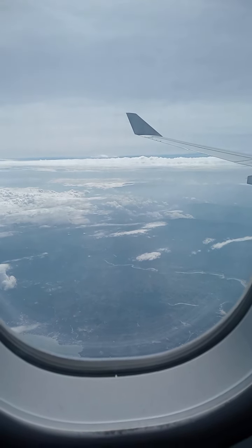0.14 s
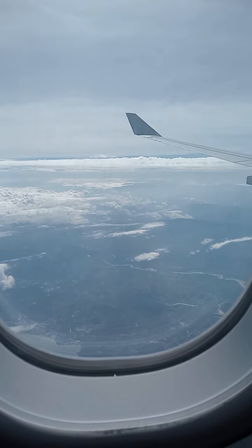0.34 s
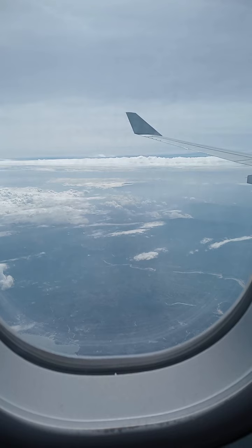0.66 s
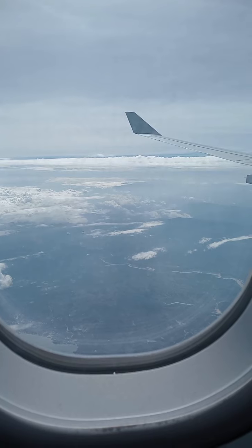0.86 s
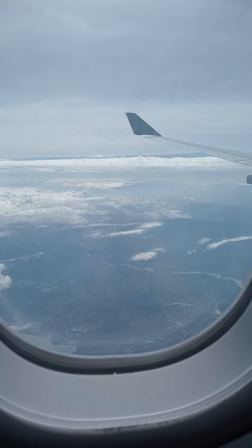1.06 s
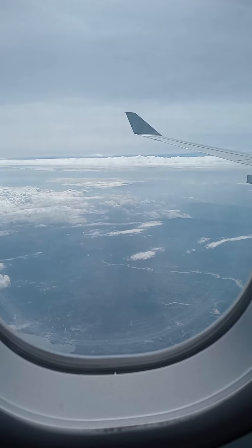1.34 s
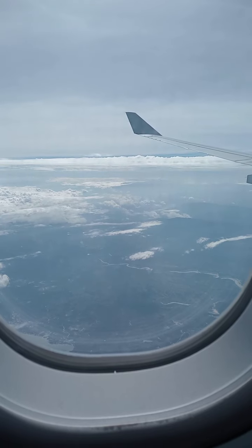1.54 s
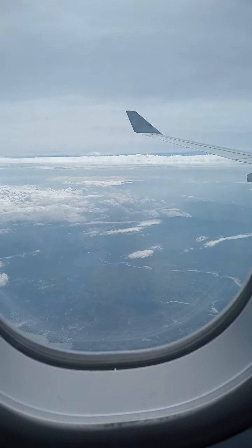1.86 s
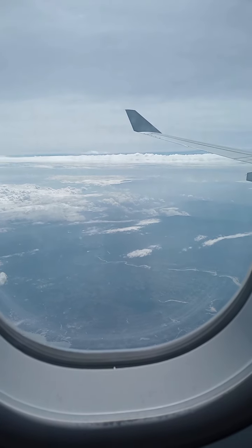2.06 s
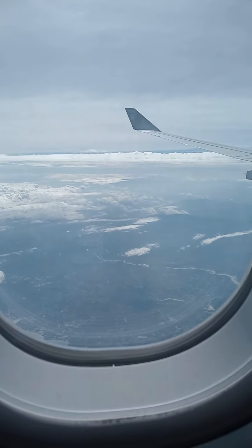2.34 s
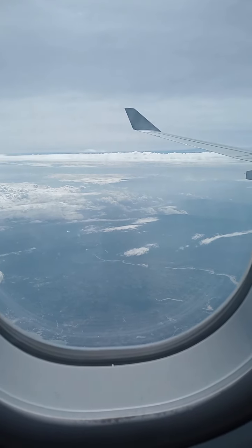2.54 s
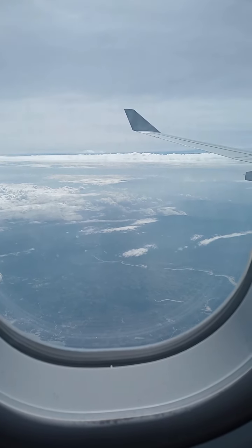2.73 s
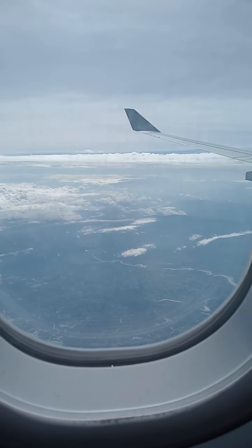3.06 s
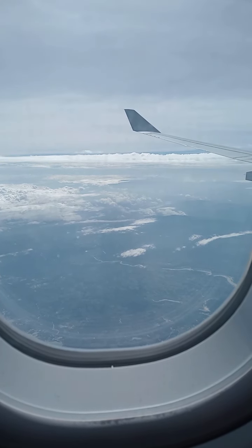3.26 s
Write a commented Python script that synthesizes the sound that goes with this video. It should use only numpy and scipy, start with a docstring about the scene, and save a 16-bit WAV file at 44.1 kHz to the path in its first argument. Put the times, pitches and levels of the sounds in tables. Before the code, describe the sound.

Low, wavering airliner cabin drone with rushing air, soft vent hiss and faint late clacks

```python
"""Engine and airflow rumble booming inside an airliner cabin in cruise, at a microphone in the cabin.
Around it are the roar of air along the skin with a drifting resonance, and the hiss and whistles of the vents:
all noise, filtered and made to waver. A faint electrical whine is a stack of steady sines. The top treble holds
thin air and a fluttering fizz of short noise flurries; three small clacks some rows away are decaying noise bursts."""
import sys
import numpy as np
from scipy import signal
from scipy.fft import rfft, irfft
from scipy.io import wavfile
from scipy.ndimage import uniform_filter1d

SR = 44100
rng = np.random.default_rng(int(sys.argv[2]) if len(sys.argv) > 2 else 0)


def persist_wave(psi):
    """Save psi, clipped to +-1, as 16-bit WAV."""
    counts = np.round(np.clip(psi, -1, 1) * 32767).astype(np.int16)
    wavfile.write(sys.argv[1], SR, np.atleast_2d(counts).T)


N = 149940  # 3.4 s


def amp(db):
    """Turns dB into an amplitude factor."""
    return 10 ** (np.asarray(db) / 20)


def evened(x):
    """Scales x to an rms of 1."""
    return x / np.sqrt(np.mean(x ** 2) + 1e-20)


def read(points, hz):
    """Reads a spectrum of (Hz, dB) points, joined by straight lines over log frequency."""
    f, value = np.transpose(points)
    return np.interp(np.log(hz + 1), np.log(f + 1), value)


def level_line(points):
    """Joins (seconds, value) points into one value per sample."""
    return np.interp(np.arange(N) / SR, *np.transpose(points))


def coloured(x, db_at):
    """Filters x by a level in dB per frequency."""
    gain = amp(db_at(np.fft.rfftfreq(len(x), 1 / SR)))
    return irfft(rfft(x) * gain, len(x))


def wander(low_hz, high_hz):
    """Irregular drift of rms 1: sixteen sines of random phase, weaker as they get faster."""
    t = np.arange(N) / SR
    rates = np.geomspace(low_hz, high_hz, num=16)
    return evened(sum(np.sin(2 * np.pi * (f * t + rng.random())) / np.sqrt(f) for f in rates))


def airflow(spectrum, patchy_db, swell_db):
    """Turbulent air: coloured noise with drifting patches in time and pitch and one shared swell, at rms 1."""
    real, imag, patches = rng.standard_normal((N // 256 + 5, 513, 3)).T
    patches = uniform_filter1d(patches, size=12, axis=0)  # across pitch
    patches = evened(uniform_filter1d(patches, size=5, axis=1))  # across time
    grid = (real + 1j * imag) * amp(patchy_db * patches)
    noise = signal.istft(grid, nperseg=1024, noverlap=768)[1][:N]
    swelling = noise * amp(swell_db * wander(4, 24))
    return evened(coloured(swelling, lambda hz: read(spectrum, hz)))


# Rumble in the cabin, with its booms. Each row: frequency in Hz, relative density in dB per Hz.
RUMBLE_SPECTRUM = [(12, -59.5), (20, -36.5), (27, -34.5), (38, -25.5), (81, -9.5), (110, -1.5), (125, 3),
                   (189, -6.5), (228, -4.5), (271, -11.5), (322, -7.5), (358, -10), (393, -9.5),
                   (443, -22.5), (480, -28.5), (620, -51.5), (1060, -120)]
# Level of the rumble over time, an irregular random wavering of low noise.
# Each row: time in seconds, level of the boom in dB, level of the rest of the rumble in dB.
RUMBLE_LEVELS = [(0.02, -25.5, -26), (0.35, -17.5, -23.5), (0.51, -22, -28), (0.54, -31, -18.5),
                 (0.57, -15.5, -27.5), (0.75, -25, -23.5), (0.95, -15, -25.5), (1.14, -26.5, -24),
                 (1.2, -16, -25.5), (1.44, -30, -25), (1.47, -15, -22.5), (1.58, -31, -26),
                 (1.61, -16, -23), (1.7, -27, -27), (2.07, -20, -24), (2.1, -26.5, -24.5),
                 (2.29, -19.5, -26), (2.34, -23.5, -23.5), (2.5, -18, -25.5), (2.54, -25.5, -24.5),
                 (2.62, -14.5, -24), (2.85, -22, -24), (3.23, -20.5, -23.5), (3.38, -26, -24)]
BOOM_HZ, BOOM_OCTAVES = 130, 0.36  # centre; distance to the -6 dB point on either side


def rumble():
    """Engine and airflow noise in the cabin; its low boom and remaining rumble waver in level separately, as
    low noise does by chance."""
    noise = airflow(RUMBLE_SPECTRUM, patchy_db=-0.12, swell_db=0.96)

    def boom_band(hz):
        octaves = np.log2((hz + 1) / BOOM_HZ)
        return np.maximum(-6 * (octaves / BOOM_OCTAVES) ** 4, -100)

    boom = coloured(noise, boom_band)
    rest = noise - boom
    # the level of the rest is counted against the noise between 190 and 430 Hz
    rest_rms = np.std(coloured(noise, lambda hz: -100. * ((hz < 190) | (hz > 430))))
    s, boom_db, rest_db = np.transpose(RUMBLE_LEVELS)
    t = np.arange(N) / SR
    boom_gain = amp(np.interp(t, s, boom_db))
    rest_gain = amp(np.interp(t, s, rest_db))
    return evened(boom) * boom_gain + rest / rest_rms * rest_gain


# Air along the skin, heard from inside. Each row: frequency in Hz, relative density in dB per Hz.
ROAR_SPECTRUM = [(270, -33.5), (460, -13.5), (555, -7.5), (625, -10.5), (676, -3.5), (766, -5), (848, -2.5),
                 (939, -5.5), (1240, -12.5), (1490, -14.5), (2120, -24), (2280, -25), (3000, -35),
                 (3900, -72.5), (6600, -120)]
ROAR_DB = -31  # rms


def roar():
    """Air rushing along the skin: mid-range turbulent noise with a slight swell."""
    return amp(ROAR_DB) * airflow(ROAR_SPECTRUM, patchy_db=1.57, swell_db=0.48)


# A resonance drifting in the roar. Each row: time in seconds, frequency in Hz.
HOWL_PITCH = [(0, 859), (0.501, 829), (.9, 876.4), (1.3, 848.6), (1.899, 885.4), (2.299, 822), (2.7, 850.6),
              (3.0, 825.4), (3.4, 864)]
HOWL_DB, HOWL_WIDTH_HZ = -41, 86  # rms; width between the -6 dB points


def howl():
    """A narrow band of noise shifted onto the drifting resonance by two carriers a quarter turn apart."""
    def band(hz):
        return -20 * np.log10(1 + (2 * hz / HOWL_WIDTH_HZ) ** 2)

    a, b = (coloured(noise, band) for noise in rng.standard_normal((2, N)))
    phase = 2 * np.pi * np.cumsum(level_line(HOWL_PITCH)) / SR
    return amp(HOWL_DB) * evened(a * np.cos(phase) + b * np.sin(phase))


# Hiss of the cabin vents. Each row: frequency in Hz, relative density in dB per Hz.
HISS_SPECTRUM = [(1700, -26), (2900, -10), (3100, -5), (3700, -4.5), (3850, -1.5), (4100, 0), (4330, -0.5),
                 (4550, -1.5), (4750, -2), (5900, -2), (6060, -1.5), (6300, -4), (6910, -11), (7390, -13.5),
                 (7600, -14.5), (9600, -26), (16300, -120)]
# Fuzzy whistles in the vents. Each row: frequency in Hz, rms level in dB.
VENT_WHISTLES = [(2255, -59.5), (3957, -73.5), (9630, -87.5)]
HISS_DB, WHISTLE_WIDTH_HZ = -51.5, 29  # rms of the hiss; width between the -6 dB points


def vents():
    """Turbulent hiss of the vents, with a few narrow noise bands as fuzzy whistles."""
    out = amp(HISS_DB) * airflow(HISS_SPECTRUM, patchy_db=1.5, swell_db=.3)
    for whistle_hz, db in VENT_WHISTLES:
        def band(hz):
            return -20 * np.log10(1 + (2 * (hz - whistle_hz) / WHISTLE_WIDTH_HZ) ** 2)

        out += amp(db) * evened(coloured(rng.standard_normal(N), band))
    return out


WHINE_HZ = 800  # fundamental, itself silent
# Partials of the whine heard in the cabin. Each entry: multiple of the fundamental.
WHINE_MULTIPLES = [7, 8, 9, 10, 12, 13, 14, 15, 16, 17, 18, 19]
# Strength of those partials, in the same order. Each entry: rms level in dB.
WHINE_LEVELS = [-78.5, -74.5, -74.5, -84, -80, -88, -86, -89, -88, -92.5, -89.5, -99]


def whine():
    """Steady high partials of the cabin's electrical supply, as sines of random phase."""
    t = np.arange(N) / SR
    out = np.zeros(N)
    for k, db in zip(WHINE_MULTIPLES, WHINE_LEVELS):
        out += amp(db) * np.sqrt(2) * np.sin(2 * np.pi * (k * WHINE_HZ * t + rng.random()))
    return out


# Colour of the treble fizz. Each row: frequency in Hz, relative density in dB per Hz.
FIZZ_SPECTRUM = [(7000, -17.5), (8500, -0.5), (9800, -3), (10250, 4), (10600, -7.5), (11900, -8.5),
                 (12300, -2), (13000, -1.5), (13400, -7.5), (14200, -6.5), (14550, 0), (14900, -10.5),
                 (15500, -6.5)]
# Flurries of fizz. Each row: start in seconds, length in seconds, level in dB.
FIZZ_FLURRIES = [(0.137, .06, -65), (.26, 0.071, -65), (.53, 0.074, -70), (.68, .04, -71),
                 (0.807, 0.058, -65), (.93, .06, -67), (1.229, .04, -63), (1.28, .04, -70),
                 (1.408, .05, -68), (1.544, .11, -63.5), (1.831, 0.028, -69), (1.916, 0.077, -68),
                 (2.028, .02, -67), (2.255, 0.033, -63), (2.31, 0.097, -66), (2.49, 0.016, -66),
                 (2.586, 0.11, -64), (3.076, .04, -74), (3.127, 0.043, -65), (3.2, .03, -76),
                 (3.32, 0.04, -66)]
FIZZ_EDGE_S = .004  # fade at either end of a flurry
FIZZ_GRAIN_DB, FIZZ_FLUTTER_DB = 2, 2.5  # rms of the level changes


def fizz():
    """Short grainy flurries of noise in the top treble, fluttering at 25 to 80 Hz."""
    t = np.arange(N) / SR
    gate = np.zeros(N)
    for start, length, db in FIZZ_FLURRIES:
        to_nearest_end = np.minimum(t - start, start + length - t)
        gate += amp(db) * np.clip(to_nearest_end / FIZZ_EDGE_S + .5, 0, 1)
    grain_db = FIZZ_GRAIN_DB * evened(uniform_filter1d(rng.standard_normal(N), size=150))
    flutter_db = FIZZ_FLUTTER_DB * wander(25, 80)
    noise = coloured(rng.standard_normal(N), lambda hz: read(FIZZ_SPECTRUM, hz) - 40 * (hz < 6500))
    return gate * evened(noise * amp(grain_db + flutter_db))


# Thin air at the top of the treble. Each row: frequency in Hz, relative density in dB per Hz.
AIR_SPECTRUM = [(5000, -30.5), (7500, -4.5), (9000, -7), (11000, -4), (14000, -7), (14900, -11),
                (15500, -12.5)]
# How strong it is at the microphone. Each row: time in seconds, level in dB.
AIR_LEVELS = [(0, -67), (.7, -67.5), (1.1, -69), (2.0, -69), (2.7, -69.5), (2.75, -72), (3.05, -72),
              (3.1, -70), (3.4, -69)]


def thin_air():
    """A thin bed of high turbulent noise under the fizz, its level moving slightly."""
    return amp(level_line(AIR_LEVELS)) * airflow(AIR_SPECTRUM, patchy_db=1.1, swell_db=.6)


# Clacks some rows away. Each row: start in seconds, burst level in dB, centre in Hz, distance from the centre
# to the -6 dB point in octaves, rise in seconds, snap level in dB, extra strength of the burst's front in dB.
CLACK_EVENTS = [(2.6885, -42, 4600, .65, 0.003, -45, 0), (2.934, -35, 3400, 1.1, 0.001, -47, 4),
                (3.3215, -44.5, 5900, 0.4, 0.004, -49, 1)]
# Resonances in the burst. Each row: frequency in Hz, width in Hz, boost (or cut) in dB.
CLACK_RESONANCES = [(2350, 200, 7), (2950, 150, 5), (3500, 340, -6.5), (3980, 150, 4), (4500, 180, 7),
                    (6140, 280, 7)]
# Colour of the wide snap. Each row: frequency in Hz, relative density in dB per Hz.
SNAP_SPECTRUM = [(1000, -21), (2000, 5), (7000, -3), (9000, -7), (11000, -18), (15500, -22)]
CLACK_T60_S, SNAP_T60_S = .135, 0.092  # time to fall 60 dB
CLACK_HOLD_S, FRONT_S = .01, 0.0066  # hold between rise and decay; length of the stronger front
CLACK_TOP_HZ, TOP_FALL_DB = 6550, 56  # above this the burst falls by so many dB per octave
CLACK_GRAIN_DB = 2  # rms of the level changes


def clack_colour(hz, centre_hz, width):
    """The burst's spectrum in dB: a bell around its centre, a falling top and the resonances."""
    bell = -6 * (np.log2((hz + 1) / centre_hz) / width) ** 2
    top = -TOP_FALL_DB * np.maximum(np.log2((hz + 1) / CLACK_TOP_HZ), 0)
    rings = sum(up / (1 + (2 * (hz - f) / w) ** 2) for f, w, up in CLACK_RESONANCES)
    return bell + top + rings


def clacks():
    """Each clack is a wide snap and a grainy burst of reflections that dies in the padded cabin."""
    out = np.zeros(N + SR)
    t = np.arange(SR // 4) / SR
    for start, db, centre_hz, width, rise, snap_db, front_db in CLACK_EVENTS:
        burst_noise, snap_noise, grain_noise = rng.standard_normal((3, len(t)))
        grain = amp(CLACK_GRAIN_DB * evened(uniform_filter1d(grain_noise, size=80)))
        burst = evened(coloured(burst_noise * grain, lambda hz: clack_colour(hz, centre_hz, width)))
        front = front_db * np.clip(1 + (FRONT_S - t) / 0.0018, 0, 1)  # fades out over 1.8 ms
        decay = -60 * np.maximum(t - rise - CLACK_HOLD_S, 0) / CLACK_T60_S
        burst *= amp(db + front + decay)
        snap = evened(coloured(snap_noise, lambda hz: read(SNAP_SPECTRUM, hz)))
        snap *= amp(snap_db - 60 * t / SNAP_T60_S)
        out[round(start * SR):][:len(t)] += np.minimum(t / rise, 1) * (burst + snap)
    return out[:N]


def scene():
    """The cabin as it reaches one microphone: all sources summed into one channel."""
    return (rumble() + roar() + howl() + vents() + whine() + fizz() + thin_air() + clacks())[None]


EDGE_HZ = 15510


def record(dry):
    """The band limit: a steep low-pass at the edge frequency."""
    lowpass = signal.firwin(1501, EDGE_HZ, window=("kaiser", 9), fs=SR)
    return signal.oaconvolve(dry, lowpass[None], "same")


dry = scene()
out = record(dry)
persist_wave(out)
```